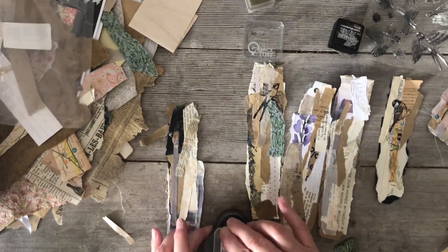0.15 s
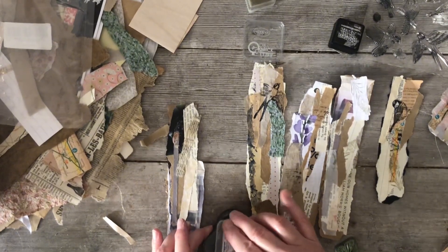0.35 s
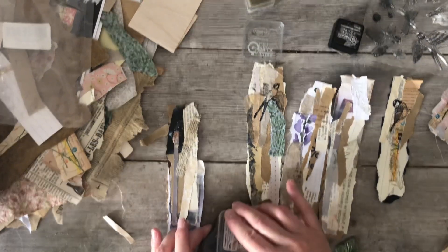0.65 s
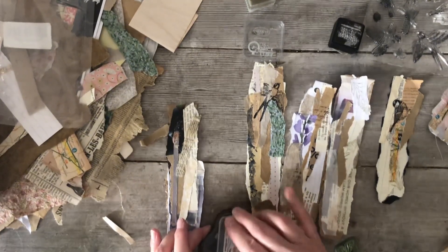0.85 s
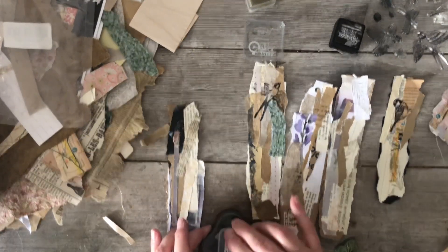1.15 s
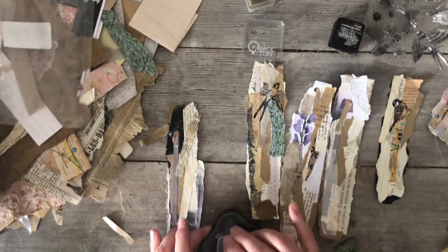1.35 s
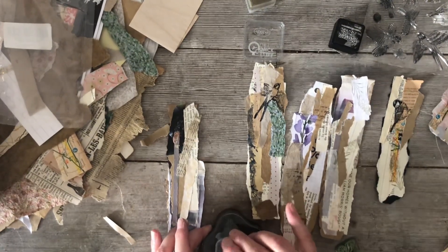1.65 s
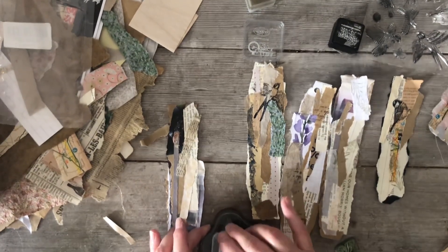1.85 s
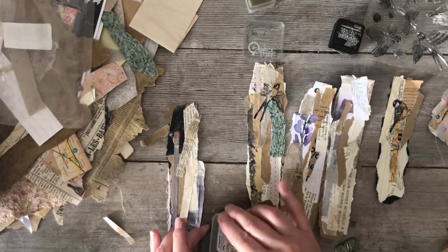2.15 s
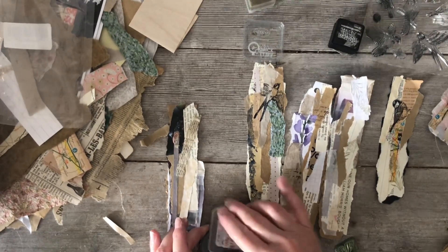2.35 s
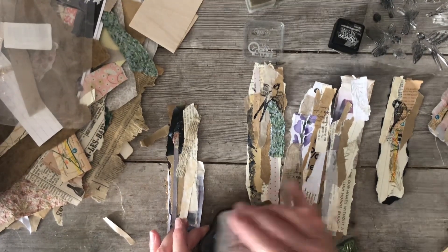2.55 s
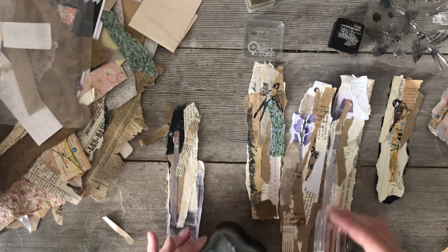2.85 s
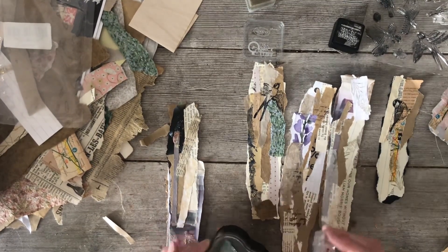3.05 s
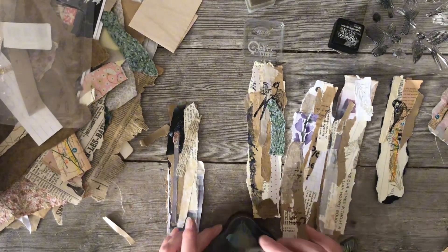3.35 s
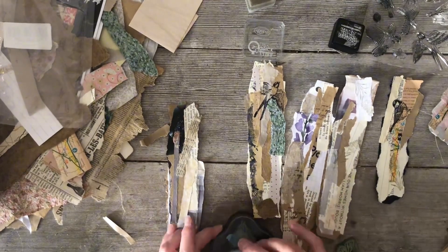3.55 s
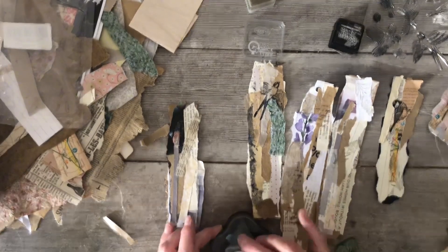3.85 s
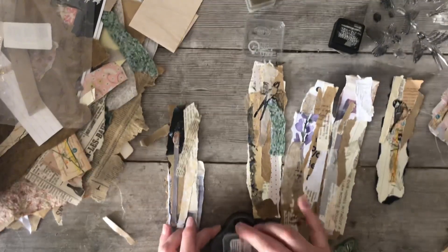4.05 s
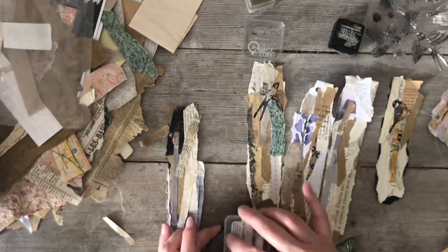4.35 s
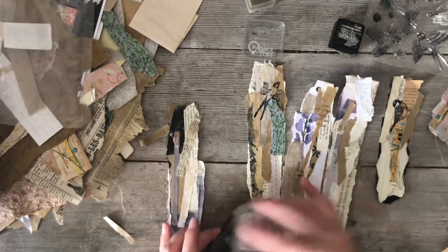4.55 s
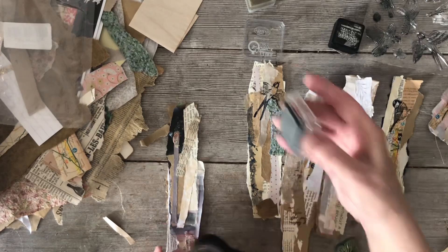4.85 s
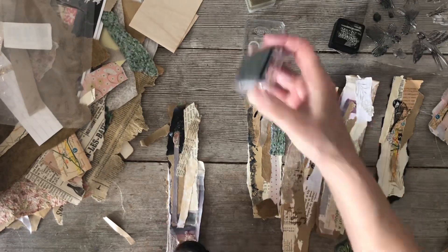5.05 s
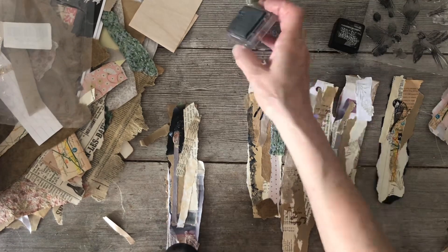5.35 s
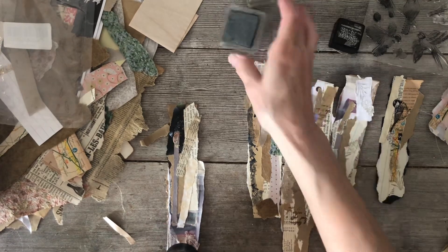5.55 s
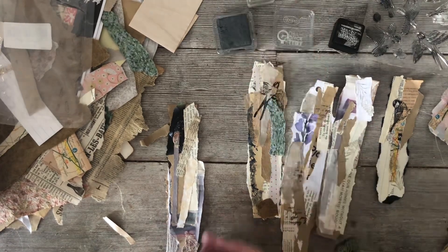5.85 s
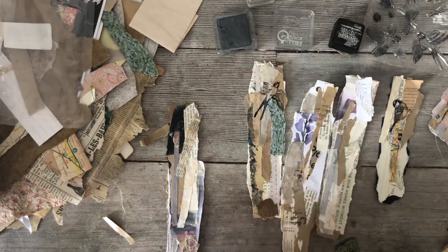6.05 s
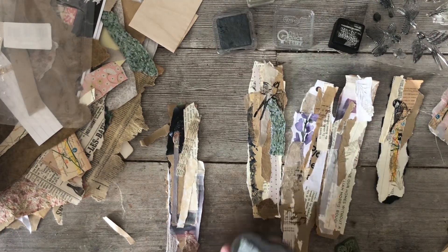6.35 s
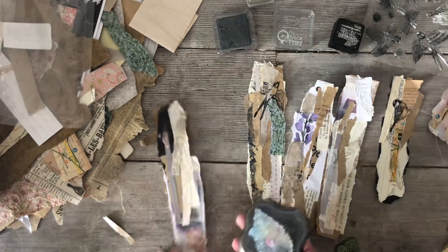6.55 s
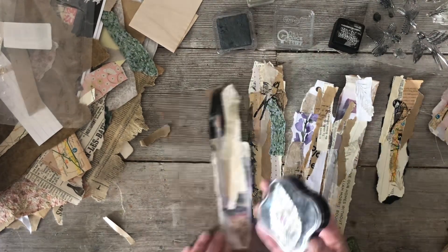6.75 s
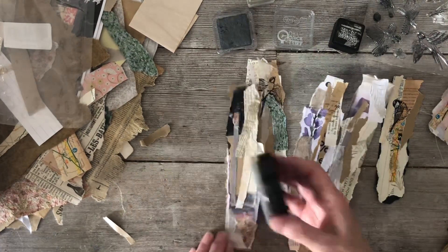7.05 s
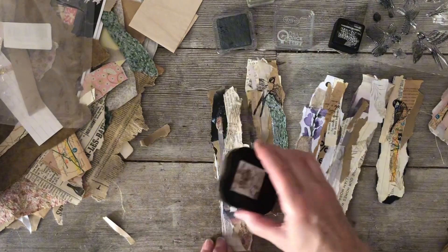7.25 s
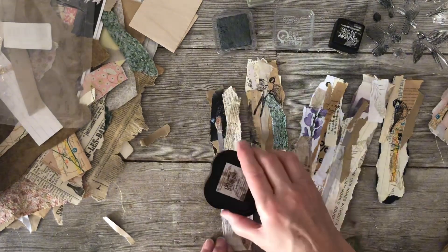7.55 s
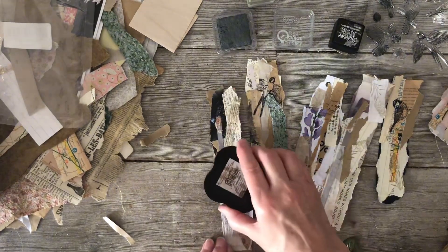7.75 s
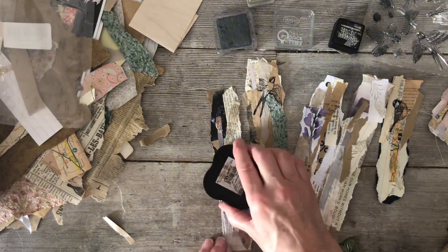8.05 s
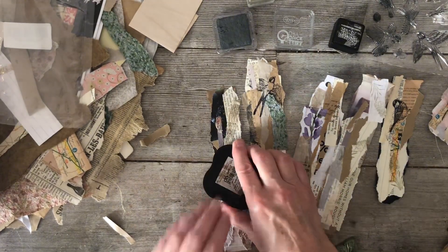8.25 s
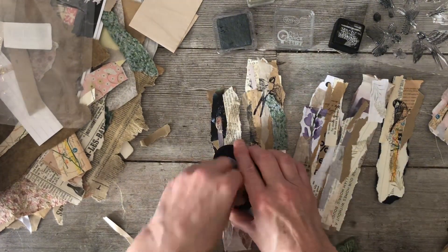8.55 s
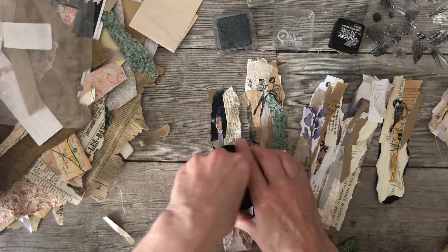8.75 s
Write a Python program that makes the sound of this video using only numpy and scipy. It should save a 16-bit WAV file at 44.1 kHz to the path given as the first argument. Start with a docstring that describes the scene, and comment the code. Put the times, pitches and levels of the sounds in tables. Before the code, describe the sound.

An ink pad dabs a stamp on a wooden desk, thudding softly; later hard plastic rattles down, paper rustles, and light knocks follow.

```python
"""Soft knocks and tacky peels come first: an ink pad is dabbed on a rubber stamp on a wooden desk.
Later a small plastic pad clatters down among its lids, and a paper strip slides over the desk.
The place is a small dry room with a faint hum; the microphone listens from just above the desk.
Blows sum damped modes and decaying noise cracks; peels and rustles are uneven noise grains given a spectrum.
"""
import sys
import numpy as np
from scipy import signal
from scipy.fft import rfft, irfft, next_fast_len
from scipy.io import wavfile

SR = 44100
rng = np.random.default_rng(int(sys.argv[2]) if len(sys.argv) > 2 else 0)


def digitize_waveform(pressure):
    """Quantize a signal to 16-bit integers and store it at the path in sys.argv[1].

    Rows of a 2-D input are taken as channels; values are limited to [-1, 1].
    """
    field = np.atleast_2d(pressure).T
    bounded = np.clip(field, -1, 1)
    quanta = np.round(bounded * 32767).astype(np.int16)
    wavfile.write(sys.argv[1], SR, quanta)


N = 392931
T = np.arange(SR // 3) / SR  # seconds within one blow


def amp(db):
    """Decibels to gain."""
    return 10 ** (np.asarray(db) / 20)


def unit(x):
    """Scale to rms 1."""
    return x / np.sqrt(np.mean(x ** 2) + 1e-20)


def unit_blow(x):
    """Scale to the energy of 10 ms at rms 1."""
    return x / np.sqrt(np.sum(x ** 2) / (SR / 100) + 1e-20)


def along(points, hz):
    """Read (Hz, value) points on a log frequency axis."""
    point_hz, values = np.transpose(points)
    return np.interp(np.log(hz + 1), np.log(point_hz + 1), values)


def curves(rows):
    """One value per sample for each column after the time in seconds."""
    times, *columns = np.transpose(rows)
    return [np.interp(np.arange(N) / SR, times, column) for column in columns]


def colour(x, spectrum):
    """Give x a spectrum and rms 1."""
    m = next_fast_len(len(x) + 2048)
    gain = amp(along(spectrum, np.fft.rfftfreq(m, 1 / SR)))
    return unit(irfft(rfft(x, m) * gain, m)[:len(x)])


def grains(spectrum, spread_db, size):
    """Dense tiny slips of very unequal strength."""
    strength = amp(spread_db * rng.standard_normal(size))
    return colour(rng.standard_normal(size) * strength, spectrum)


def add(track, start_s, sound):
    """Mix a sound into the track at start_s."""
    part = track[max(round(start_s * SR), 0):][:len(sound)]
    part += sound[:len(part)]


def ring(modes, attack, vary_db):
    """Damped modes pushed together over attack seconds; each blow meets them at new strengths."""
    hz, db, t60 = np.transpose(modes)[:, :, None]
    strength = amp(db + vary_db * rng.standard_normal(hz.shape))
    # each mode is detuned a little at random for every blow
    detuned = hz * (1 + 0.0055 * rng.standard_normal(hz.shape))
    waves = strength / hz * amp(-60 * T / t60) * np.sin(2 * np.pi * detuned * T)
    motion = np.sum(waves, axis=0) * (1 - np.exp(-T / attack))
    return unit_blow(np.diff(motion, prepend=0))  # the air follows the speed of the surface


def excited(modes, centre_hz, fall_db):
    """The spot that is struck favours the modes around one frequency."""
    return [(hz, db - fall_db * np.log2(hz / centre_hz) ** 2, t60) for hz, db, t60 in modes]


def burst(spectrum, t60):
    """Many close, quickly damped modes: a crack."""
    noise = colour(rng.standard_normal(len(T)), spectrum)
    return unit_blow(noise * amp(-60 * T / t60) * (1 - np.exp(-T / .0004)))


# decay of the small room's tail: pitch_hz, t60_s
ROOM_DECAY = [(150, 0.32), (700, 0.25), (2000, 0.23), (4000, 0.2), (8000, 0.24), (15000, 0.07)]


def in_room(x, wet_db):
    """The sound and its short room tail, made of fresh noise for every sound."""
    hz, t, noise = signal.stft(rng.standard_normal(len(T)), SR, nperseg=256)
    decay = amp(-60 * t / along(ROOM_DECAY, hz)[:, None])
    tail = signal.istft(noise * decay, SR, nperseg=256)[1]
    # the nearest walls answer after a few ms
    tail = tail * (1 - np.exp(-(np.arange(len(tail)) / SR / 0.0032) ** 2))
    return x + amp(wet_db) * signal.fftconvolve(x, tail / np.linalg.norm(tail))[:len(x)]


# low room noise: pitch_hz, density_db
MURMUR_SPECTRUM = [(20, -28), (50, -7.5), (70, 2), (130, -8.5), (200, -12), (300, -11), (430, -22.5),
                   (700, -16), (1050, -21), (1400, -25.5), (2200, -37.5), (4000, -56.5)]
# treble room noise: pitch_hz, density_db
HISS_SPECTRUM = [(900, -20), (2000, 0), (4000, -6), (8000, -10), (15000, -12)]
# swell of the distant drone: time_s, level_db
DRONE_LEVEL = [(0, -75), (5.8, -72), (6.5, -63.5), (7.2, -65.5), (8.2, -66.5), (8.91, -59)]
# colour of the drone: pitch_hz, density_db
DRONE_SPECTRUM = [(150, -29.5), (230, -11.5), (290, -1), (345, 1), (390, -7), (445, -2), (530, -12),
                  (640, -9.5), (820, -31), (1070, -16), (1350, -23.5), (2100, -24), (6000, -36)]


def background():
    """Steady room noise, a wavering hum of narrow noise near 98 Hz and a far drone."""
    drone_db, = curves(DRONE_LEVEL)
    murmur = amp(-66.5) * colour(rng.standard_normal(N), MURMUR_SPECTRUM)
    hum_spectrum = [(70, -69.5), (90, -14), (98, 2.5), (108, -11.5), (135, -71)]
    hum = amp(-70.0) * colour(rng.standard_normal(N), hum_spectrum)
    hiss = amp(-80) * colour(rng.standard_normal(N), HISS_SPECTRUM)
    drone = amp(drone_db) * colour(rng.standard_normal(N), DRONE_SPECTRUM)
    return murmur + hum + hiss + drone


# hollow tone of the case under a peel: pitch_hz, density_db
HOLLOW_SPECTRUM = [(500, -18), (780, -15), (900, -2.5), (1150, -18.5), (1440, -14), (2000, -17.5),
                   (3500, -38.5)]
# crackle of the breaking contacts: pitch_hz, density_db
CRACKLE_SPECTRUM = [(1400, -62), (2600, -1.5), (4000, 0), (6500, -7), (10000, -38)]
# finest treble of peels, clicks and paper: pitch_hz, density_db
FIZZ_SPECTRUM = [(4500, -8), (7200, -1), (11000, -3.5), (15500, -8)]
CRACKLE_DB, FIZZ_DB = -2.5, -6.5  # treble layers of a peel, against its hollow tone at brightness 0


def peel(half_s, bright_db):
    """Tiny contacts break in a short swell that peaks after two half lengths, in the hollow of the case."""
    swell = np.exp(-((T - 2 * half_s) / (1.03 * half_s)) ** 2)
    layers = [(-bright_db, HOLLOW_SPECTRUM), (CRACKLE_DB, CRACKLE_SPECTRUM),
              (FIZZ_DB + bright_db, FIZZ_SPECTRUM)]
    sound = np.zeros(len(T))
    for db, spectrum in layers:
        sound += amp(db) * unit_blow(swell * grains(spectrum, spread_db=13.0, size=len(T)))
    return amp(3.5) * in_room(sound, wet_db=-12.5)


# brief scuffs of paper, rubber and fingers: peak_s, half_length_s, level_db, brightness_db
SCUFF_EVENTS = [(0.072, 0.024, -65.5, -2), (1.176, .008, -70.5, -5), (2.074, 0.015, -66, -0.5),
                (4.555, 0.009, -60.5, 5), (5.42, .006, -68.5, 8), (5.979, 0.021, -69, 4),
                (6.111, 0.02, -73.5, 7), (6.441, 0.0066, -66, 3), (7.882, .019, -72.5, 8),
                (8.171, 0.012, -66, -1.5), (8.484, .026, -62.5, -0.5), (8.53, .007, -68.5, 2.5),
                (8.603, .028, -62, 1)]


def scuffs():
    """Surfaces brush past each other as things are picked up and placed."""
    out = np.zeros(N)
    for peak_s, half_s, level_db, bright_db in SCUFF_EVENTS:
        add(out, peak_s - 2 * half_s, amp(level_db) * peel(half_s, bright_db))
    return out


# modes of the ink case: pitch_hz, level_db, t60_s
CASE_MODES = [(881, 6, 0.04), (975, -0.5, 0.071), (1120, -10, 0.02), (1408, 2.5, 0.053), (1870, 0.5, 0.01),
              (2110, 9, 0.017), (2240, -1.5, 0.018), (2896, 2, 0.017)]
# modes of the desk boards: pitch_hz, level_db, t60_s
BOARD_MODES = [(186, -5.5, 0.074), (254, 1, 0.036), (302, -3, .06), (364, -4, .05), (425, -2.5, 0.03),
               (476.5, 0.5, 0.036), (546, -3.5, 0.028), (654, -1.5, 0.035), (707, -3.5, .028)]
# modes of the whole desk: pitch_hz, level_db, t60_s
DESK_MODES = [(54.15, -11.5, 0.17), (67, -4.5, 0.23), (97.7, 1.5, 0.19), (112, -12, 0.03),
              (148.8, -6, 0.23)]
# crack within the case clack: pitch_hz, density_db
CRACK_SPECTRUM = [(400, -22), (850, 0.5), (1400, -3), (2300, -3.5), (3100, -9), (4000, -32)]
# snap of the case edges: pitch_hz, density_db
SNAP_SPECTRUM = [(1700, -20.5), (2400, -2.5), (3200, 5), (4100, 2), (5000, -7.5), (6100, -9.5), (7500, -25),
                 (11000, -45)]
# thin tick on top of hard contacts: pitch_hz, density_db
TICK_SPECTRUM = [(4500, -46.5), (7000, 5.5), (9000, 2.5), (12000, -4.5), (16000, -7)]
# the dense upper modes of the boards: pitch_hz, density_db
WOOD_SPECTRUM = [(150, -5), (320, -4), (800, 3), (1400, 1), (2300, -20), (4000, -34), (8000, -49)]
WOOD_DB, WOOD_T60_S = -10.5, 0.14
SNAP_DB, SNAP_GROWS = 0.5, 0.44  # edge snap over the case clack; its gain for each dB of hardness
TICK_DB, TICK_GROWS = -69, 0.64  # tick at a firm snap; its gain for each dB of snap
FIRM_SNAP_DB, FIRM_CLACK_DB = -50, -52.5  # levels at which tick and contact have their usual size


def blow(force_db, hardness_db, centre_hz, thump_db):
    """The case clacks first; the boards and the whole desk follow as the pad is squeezed."""
    clack_db = force_db + hardness_db
    snap_db = clack_db + SNAP_DB + SNAP_GROWS * hardness_db
    tick_db = TICK_DB + TICK_GROWS * (snap_db - FIRM_SNAP_DB)
    contact_s = 0.02 * amp(-.25 * (clack_db - FIRM_CLACK_DB))  # gentle dabs stay in contact longer

    crack = burst(CRACK_SPECTRUM, contact_s * 2.2)
    clack = unit_blow(ring(CASE_MODES, attack=0.0031, vary_db=7.5) + amp(4) * crack)
    hard = amp(clack_db) * clack
    hard += amp(snap_db) * burst(SNAP_SPECTRUM, contact_s)
    hard += amp(tick_db) * burst(TICK_SPECTRUM, contact_s)
    knock = ring(excited(BOARD_MODES, centre_hz, fall_db=9.5), attack=0.0055, vary_db=2.5)

    out = amp(1.3) * in_room(hard, wet_db=-13)
    add(out, 0.00199, amp(force_db - 2.5) * in_room(knock, wet_db=-11.0))
    add(out, 0.00199, amp(force_db + WOOD_DB) * burst(WOOD_SPECTRUM, WOOD_T60_S))
    add(out, 0.00392, amp(thump_db) * ring(DESK_MODES, attack=0.0035, vary_db=4.5))
    return out


# the ink pad comes down on the stamp, rests and is pulled off:
# start_s, force_db, hardness_db, knock_centre_hz, rest_s, lift_tack_db
DAB_EVENTS = [(0.1399, -43.5, -1, 453, .14, -70.5), (0.347, -50, -16.5, 450, 0.15, -68.5),
              (0.5777, -39.5, -7.5, 630, 0.16, -62), (0.834, -37, -6, 500, 0.12, -62),
              (1.072, -35.5, -8.5, 440, 0.14, -64), (1.288, -55.5, -9.5, 457, 0.14, -66),
              (1.513, -61, 2, 500, 0.14, -61.5), (1.752, -51.5, -8, 330, 0.13, -65),
              (2.146, -47.5, -20, 605, 0.13, -63.5), (2.362, -41, -15, 610, 0.13, -57.5),
              (3.555, -55.5, -7.5, 526, .139, -67), (3.809, -52, -6, 427, .13, -101),
              (4.007, -49, -8.5, 517, .1, -80), (4.198, -47.5, -13, 398, 0.11, -66.5),
              (4.398, -42, -16, 600, 0.11, -60.5)]
# snapping ink and rustling paper fibres: pitch_hz, density_db
RUSTLE_SPECTRUM = [(1000, -16.5), (2500, -18), (3400, -4), (3900, -0.5), (4600, -3), (5900, -0.5),
                   (7200, -9), (10000, -30)]
# the desk thumps under the weight of the hand, less tied to force than the knock
USUAL_FORCE_DB, THUMP_DB, THUMP_GROWS = -45.5, -44, 0.51
THUMP_DB_PER_OCTAVE, USUAL_KNOCK_HZ = 7, 493  # a flatter dab knocks lower and thumps more
# wet ink squeezed as the pad lands
SQUELCH_DB, SQUELCH_AFTER_S, SQUELCH_HALF_S, SQUELCH_BRIGHT_DB = -67.5, .012, 0.0058, 2
LIFT_HALF_S, LIFT_BRIGHT_DB = 0.013, -1  # the swell of one lift
RELEASE_DB, RELEASE_EARLY_S = -3.5, .011  # the first thread of ink snaps just before the lift peaks


def dabs():
    """Each dab knocks and squeezes the wet ink; after a short rest the pad peels off the rubber."""
    out = np.zeros(N)
    for start_s, force_db, hardness_db, centre_hz, rest_s, tack_db in DAB_EVENTS:
        octaves = np.log2(centre_hz / USUAL_KNOCK_HZ)
        thump_db = THUMP_DB + THUMP_GROWS * (force_db - USUAL_FORCE_DB) - THUMP_DB_PER_OCTAVE * octaves
        squelch = amp(SQUELCH_DB) * peel(SQUELCH_HALF_S, SQUELCH_BRIGHT_DB)
        lift = amp(tack_db) * peel(LIFT_HALF_S, LIFT_BRIGHT_DB)
        release = amp(tack_db + RELEASE_DB) * burst(RUSTLE_SPECTRUM, t60=.01)
        add(out, start_s, blow(force_db, hardness_db, centre_hz, thump_db))
        add(out, start_s + SQUELCH_AFTER_S - 2 * SQUELCH_HALF_S, squelch)
        add(out, start_s + rest_s - 2 * LIFT_HALF_S, lift)
        add(out, start_s + rest_s - RELEASE_EARLY_S, release)
    return out


# light clicks of plastic and fingernails: start_s, level_db, brightness_db
CLICK_EVENTS = [(0.743, -65.5, -22.5), (0.9417, -71, 3), (2.2439, -54, -7), (2.4873, -63, 10),
                (4.021, -60, -10), (4.21, -61.5, -14), (4.5597, -56.5, 15.5), (4.748, -71, 11),
                (4.864, -67, 7), (5.949, -65.5, 0), (6.2183, -62.5, 7), (7.884, -71, 11),
                (8.4077, -47.5, -4), (8.455, -64, -2), (8.601, -60, -10)]
# a hard point on plastic: pitch_hz, density_db
PLASTIC_SPECTRUM = [(1500, -24.5), (2800, -8), (3800, 2.5), (4600, -1.5), (6100, -5), (7500, -14),
                    (12000, -27.5)]
CLICK_CLACK_DB, CLICK_TICK_DB = -12, -6  # case tone and top tick against the snap, at brightness 0


def clicks():
    """Touches too light to move the desk: a plastic snap, some case tone and a fine tick."""
    out = np.zeros(N)
    for start_s, level_db, bright_db in CLICK_EVENTS:
        click = amp(CLICK_CLACK_DB - bright_db) * ring(CASE_MODES, attack=0.000067, vary_db=2.5)
        click += burst(PLASTIC_SPECTRUM, t60=.013)
        click += amp(CLICK_TICK_DB + bright_db) * burst(FIZZ_SPECTRUM, t60=.014)
        add(out, start_s, amp(level_db) * in_room(click, wet_db=-10.5))
    return out


# case and hands set down on the desk: start_s, force_db, hardness_db, knock_centre_hz, thump_db
KNOCK_EVENTS = [(3.239, -34, -3, 563, -60), (3.2448, -36, -2, 600, -52), (6.2, -51.5, -14, 310, -57),
                (6.425, -53.5, -24, 330, -46.5), (7.88, -59, -24, 296, -44.5),
                (8.408, -42.5, -11.5, 450, -46), (8.583, -65.5, 1, 430, -54), (8.601, -59.5, 2, 430, -52),
                (8.76, -70.5, 2, 346, -48.5), (8.904, -47.5, -6, 408, -70)]


def knocks():
    """The case and the hands meet the desk, driving the same modes as a dab."""
    out = np.zeros(N)
    for start_s, force_db, hardness_db, centre_hz, thump_db in KNOCK_EVENTS:
        add(out, start_s, blow(force_db, hardness_db, centre_hz, thump_db))
    return out


# the small pad skids between bounces: start_s, length_s, level_db
SKID_EVENTS = [(5.234, 0.1, -46.5), (5.464, 0.23, -49.5)]
# grating of plastic on the boards: pitch_hz, density_db
SKID_SPECTRUM = [(90, -25.5), (155, 2.5), (260, -3.5), (400, -4), (490, 1.5), (680, -6.5), (1100, 1.5),
                 (1600, -2.5), (2100, -4), (2700, -1.5), (3600, -17), (6000, -21), (10000, -26)]
SKID_ATTACK_S, SKID_FADE_DB_PER_S = 0.0041, 321


def skids():
    """The pad grates over the boards in uneven slips, then comes to rest."""
    t = np.arange(N) / SR
    level = np.zeros(N)
    for start_s, length_s, level_db in SKID_EVENTS:
        fade_db = SKID_FADE_DB_PER_S * np.maximum(t - start_s - length_s, 0)
        level += amp(level_db - fade_db) * np.clip((t - start_s) / SKID_ATTACK_S, 0, 1)
    return level * grains(SKID_SPECTRUM, spread_db=7.5, size=N)


# a loose lid nudged by the pad: start_s, level_db
LID_EVENTS = [(5.2359, -39), (5.5298, -31)]
# modes of the lid: pitch_hz, level_db, t60_s
LID_MODES = [(2270, 0, .06), (2450, -4.5, .05), (2710, -3, 0.054), (2840, -5.5, .05), (3600, -6, 0.023),
             (4266, -2.5, .015), (5220, 4, 0.0068), (5520, 3, 0.0097), (6300, -4, .014), (8600, -9, .02),
             (10200, -15.5, .03)]
LID_SNAP_DB, LID_TICK_DB = -4.5, -14.5  # against the ringing lid


def lid():
    """The thin lid is caught on its edge and rings higher than the pad."""
    out = np.zeros(N)
    for start_s, level_db in LID_EVENTS:
        crack = amp(LID_SNAP_DB) * burst(PLASTIC_SPECTRUM, t60=0.017)
        crack += amp(LID_TICK_DB) * burst(TICK_SPECTRUM, t60=.02)
        tone = ring(LID_MODES, attack=0.00016, vary_db=1)
        add(out, start_s, amp(level_db) * in_room(tone + crack, wet_db=-13))
    return out


# modes of the plastic edges: pitch_hz, level_db, t60_s
EDGE_MODES = [(3100, -9.5, 0.0081), (3330, -5, 0.023), (3640, -2, 0.016), (4100, 0, 0.007),
              (4300, -1, 0.019), (5230, -3, .016), (5950, -7.5, 0.016)]


def snap(t60, crack_db):
    """Hard plastic edges meeting: ringing edge modes and a crack."""
    edges = ring(EDGE_MODES, attack=0.0015, vary_db=5.5)
    return unit_blow(edges + amp(crack_db) * burst(PLASTIC_SPECTRUM, t60))


# the small pad lands and rocks; a corner rings high, the flat side low:
# start_s, strength_db, ring_centre_hz
CLATTER_EVENTS = [(5.2935, -37.5, 1800), (5.309, -43.5, 2100), (5.327, -50.5, 2100), (5.357, -47.5, 1730),
                  (5.4473, -36, 1364), (5.482, -41.5, 1296), (5.502, -45.5, 1850), (5.508, -43.5, 2040),
                  (5.531, -42.5, 1254), (5.581, -48.5, 1450), (5.597, -17, 1980), (5.602, -23, 1950),
                  (5.6312, -36, 2070), (5.6526, -30, 1670), (5.6853, -36, 1760), (5.698, -44, 1414)]
# modes of the small hollow pad: pitch_hz, level_db, t60_s
SHELL_MODES = [(1074, -3.5, 0.05), (1300, 1, 0.018), (1500, -3, 0.025), (1770, -7.5, 0.029),
               (1929, 0.5, 0.027), (2100, -4.5, 0.03), (2280, -11.5, 0.015), (2680, -13.5, 0.017)]
USUAL_RING_HZ, USUAL_RING_DB = 1850, -36.5
EDGE_DB, EDGE_DB_PER_OCTAVE, EDGE_TICK_DB = -11, 20, -11  # corners snap more
# the flat side knocks the boards more
FLAT_KNOCK_DB, FLAT_DB_PER_OCTAVE, FLAT_KNOCK_GROWS = -51, 20.5, 0.56


def clatter():
    """The hollow pad bounces on the boards, ringing near 2 kHz: corners snap, the flat side knocks."""
    out = np.zeros(N)
    for start_s, ring_db, centre_hz in CLATTER_EVENTS:
        octaves = np.log2(centre_hz / USUAL_RING_HZ)
        snap_db = ring_db + EDGE_DB + EDGE_DB_PER_OCTAVE * octaves
        knock_db = FLAT_KNOCK_DB + FLAT_KNOCK_GROWS * (ring_db - USUAL_RING_DB)
        knock_db -= FLAT_DB_PER_OCTAVE * octaves

        shell = ring(excited(SHELL_MODES, centre_hz, fall_db=39), attack=0.00073, vary_db=2.5)
        edges = snap(t60=0.022, crack_db=1.5) + amp(EDGE_TICK_DB) * burst(TICK_SPECTRUM, t60=0.02)
        boards = in_room(ring(BOARD_MODES, attack=.003, vary_db=5.5), wet_db=-0.5)
        desk = ring(excited(DESK_MODES, centre_hz=160, fall_db=16), attack=.012, vary_db=2)
        add(out, start_s, in_room(amp(ring_db) * shell + amp(snap_db) * edges, wet_db=-12.5))
        add(out, start_s, amp(knock_db - 2.5) * boards)
        add(out, start_s, amp(knock_db - 9) * desk)
    return out


# the paper strip drawn over the desk: time_s, level_db
SLIDE_LEVEL = [(6.3, -62), (6.404, -77.5), (6.436, -73), (6.504, -73), (6.65, -58.5), (6.75, -65.5),
               (6.772, -55), (6.796, -65), (6.942, -74), (7.138, -69.5), (7.338, -79), (7.35, -83)]
SLIDE_RUSTLE_DB, SLIDE_FIZZ_DB = 0.5, 1


def slide():
    """Paper fibres catch on the wood; strength and brightness drift as the strip is drawn across."""
    level_db, = curves(SLIDE_LEVEL)
    moving, = curves([(6.3, 0), (6.44, 1), (7.15, 1), (7.34, 0)])
    knots = np.arange(0, N / SR, .03)  # a new drift target every 30 ms
    drift = rng.standard_normal((len(knots), 2))
    rustle_drift, fizz_drift = curves(np.column_stack([knots, drift]))
    rustle = amp(SLIDE_RUSTLE_DB + 2.1 * rustle_drift) * grains(RUSTLE_SPECTRUM, spread_db=6.5, size=N)
    fizz = amp(SLIDE_FIZZ_DB + 1.8 * fizz_drift) * grains(FIZZ_SPECTRUM, spread_db=7.0, size=N)
    return moving * amp(level_db) * (rustle + fizz)


def scene():
    """Everything on the desk, heard from just above it, as one channel."""
    room_and_ink = background() + scuffs() + dabs() + clicks() + knocks()
    pad_and_paper = skids() + lid() + clatter() + slide()
    return (room_and_ink + pad_and_paper)[None]


TOP_HZ = 16100  # band limit of the microphone


def record(dry):
    """The microphone cuts steeply above its band limit."""
    m = next_fast_len(N + SR // 2)
    loss = np.sqrt(1 + (np.fft.rfftfreq(m, 1 / SR) / TOP_HZ) ** 160)
    return irfft(rfft(dry, m) / loss, m)[..., :N]


dry = scene()
out = record(dry)
digitize_waveform(out)
```